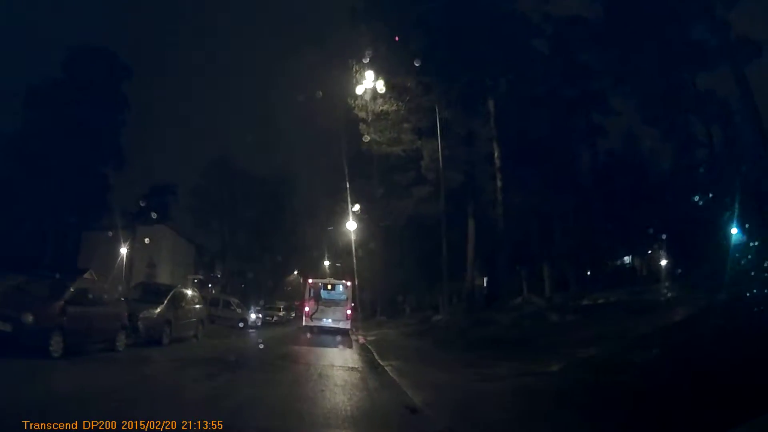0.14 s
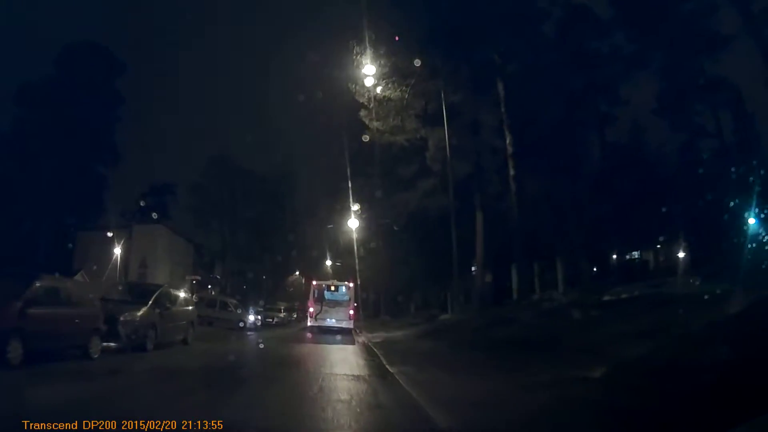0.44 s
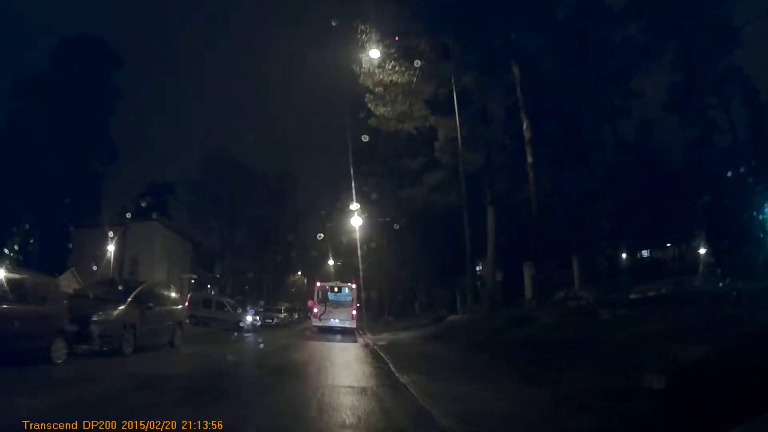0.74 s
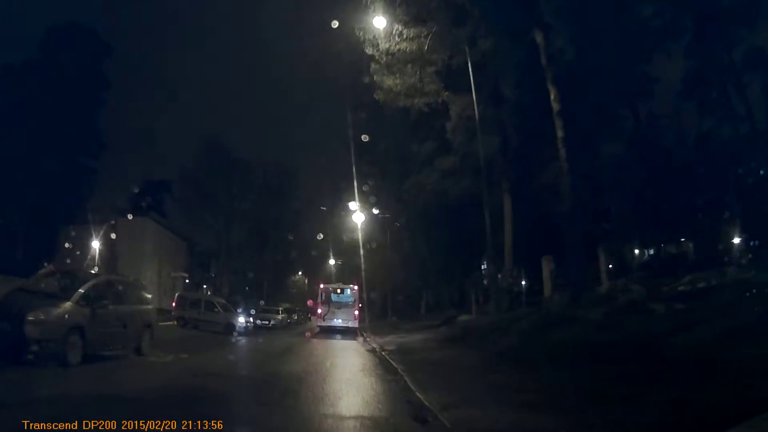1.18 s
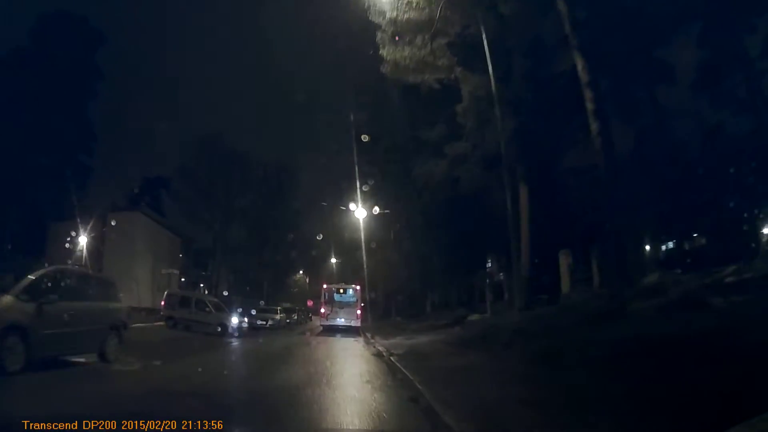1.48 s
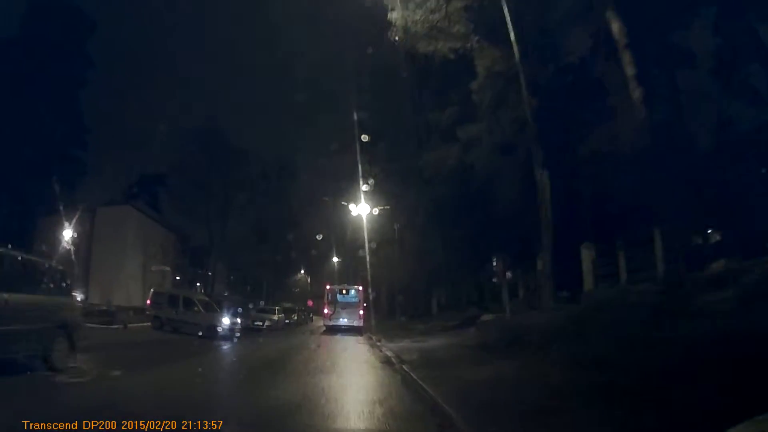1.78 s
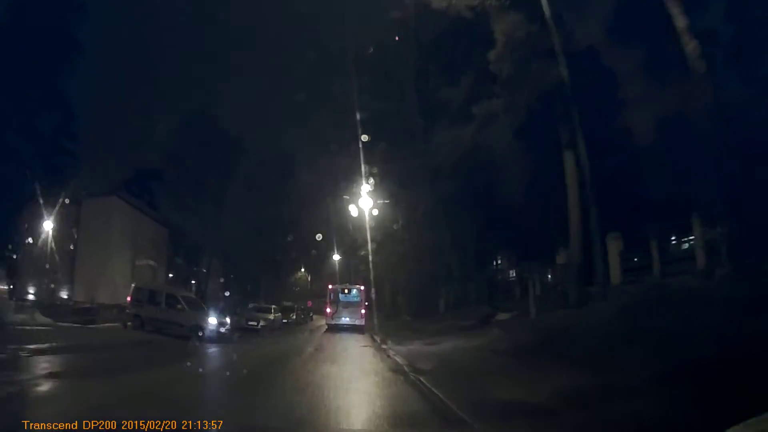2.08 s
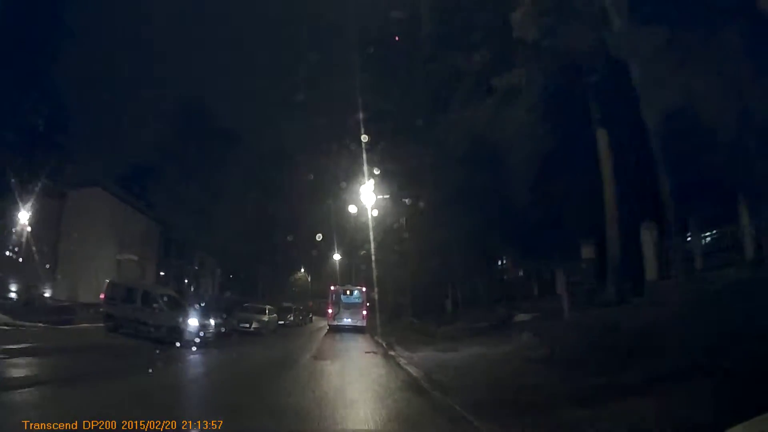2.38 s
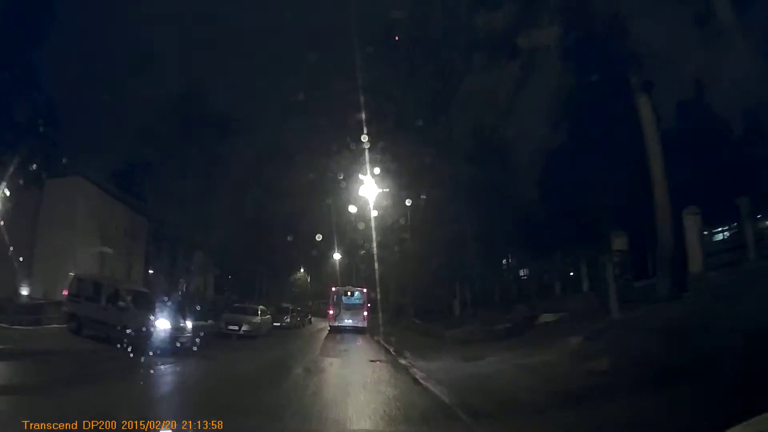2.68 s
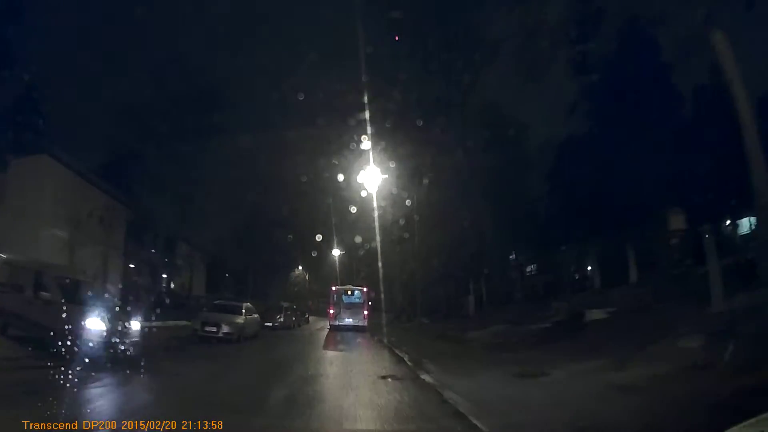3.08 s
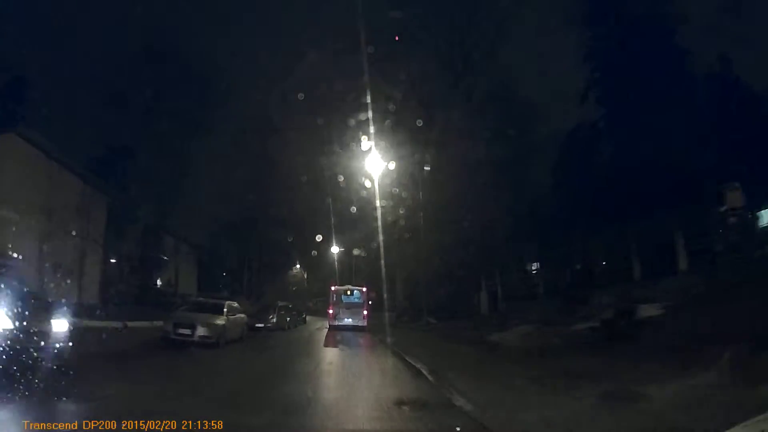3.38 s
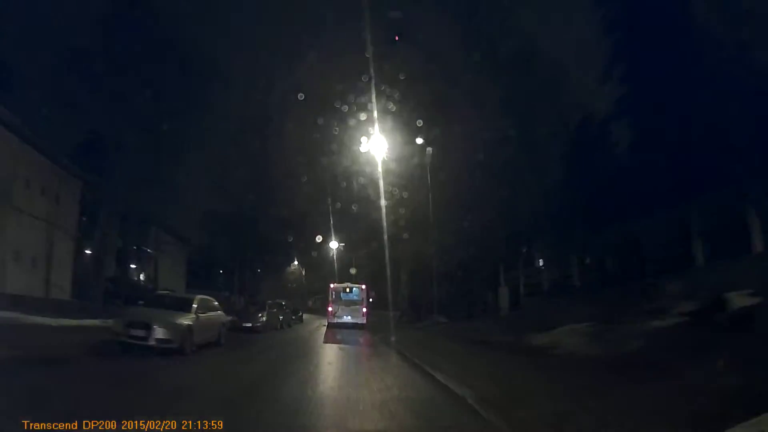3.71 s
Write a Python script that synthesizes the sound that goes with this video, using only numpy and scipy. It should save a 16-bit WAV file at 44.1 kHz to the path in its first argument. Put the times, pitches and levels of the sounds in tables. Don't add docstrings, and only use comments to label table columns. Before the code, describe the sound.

Inside a moving car, the engine's low drone climbs in pitch and gets louder, with muffled road noise and faint hiss. One loud dry click lands near the microphone halfway, then faint trim squeaks follow.

```python
import sys
import numpy as np
from scipy import signal
from scipy.fft import rfft, irfft
from scipy.io import wavfile
from scipy.ndimage import uniform_filter1d

SR = 44100
rng = np.random.default_rng(int(sys.argv[2]) if len(sys.argv) > 2 else 0)


def bounce(signal):
    frames = np.transpose(np.atleast_2d(signal))
    limited = np.clip(frames, -1, 1)
    pcm = np.round(limited * 32767).astype(np.int16)
    wavfile.write(sys.argv[1], SR, pcm)


def gain_from_db(level_db):
    decades = np.asarray(level_db, float) / 20
    return 10 ** decades


N = 169785


def level(x, db):
    return x * gain_from_db(db) / np.sqrt(np.mean(x ** 2))


def band(x, hz, width_hz):
    return signal.lfilter(*signal.iirpeak(hz, hz / width_hz, fs=SR), x)


def walk(rate_hz):
    hold = int(SR / rate_hz)
    steps = np.repeat(rng.standard_normal(N // hold + 1), hold)
    slewed = uniform_filter1d(uniform_filter1d(steps, hold), hold)
    return 1.74 * slewed[:N]


def coloured(spectrum, flicker_db, rate_hz):
    hz, db = np.array(spectrum, float).T
    f = np.maximum(np.arange(N // 2 + 1) * SR / N, 1)
    place = np.log(f / hz[0]) / np.log(hz[-1] / hz[0])
    gain = gain_from_db(np.interp(np.log(f), np.log(hz), db, left=-120, right=-120))
    out = 0
    for centre in np.linspace(0, 1, num=6):
        share = np.sqrt(np.clip(1 - 5 * np.abs(place - centre), 0, 1))
        part = irfft(rfft(rng.standard_normal(N)) * gain * share, N)
        out = out + gain_from_db(flicker_db * walk(rate_hz)) * part
    return out


def firing_turns(t):
    # time in seconds, firing rate in Hz.
    firing_rate = [(0.0, 31.28), (0.11, 32.23), (0.21, 32.76), (0.37, 34.7), (0.47, 34.95), (0.74, 38.3),
                   (1.18, 44.52), (1.99, 55.16), (2.1, 57.03), (2.51, 63.32), (3.45, 74.87), (3.85, 79.96)]
    rate_hz = np.interp(t, *np.array(firing_rate).T)
    return np.cumsum(rate_hz * (1 + .001 * walk(15))) / SR


def cabin(x):
    # centre in Hz, width in Hz, level in dB.
    resonances = [(72, 30, -16.5), (102.8, 19, -9.5), (145.9, 13.7, 1), (161.5, 18.2, -4),
                  (188.6, 8.2, -10.5), (235.5, 27.3, -4.5), (256.4, 20.2, -5), (285.4, 19.4, -2.5),
                  (346.8, 22, 3), (374.5, 30, -9.5), (425, 40, -10), (490.4, 12, -12), (540, 18, -12),
                  (670, 240, -11)]
    return sum(gain_from_db(db) * band(x, hz, width_hz) for hz, width_hz, db in resonances)


def engine(t, turns):
    order_db = [1, 0, -3, -4.5, -10, -13.5, -13, -19, -19, -19.5]
    # time in seconds, level in dB.
    load = [(0, -14), (.15, -5.5), (.35, -2.5), (.55, 0.5), (.75, -4), (1, -4), (1.2, -5), (1.35, -2.5),
            (1.7, -3), (2.1, -1), (2.4, 0), (2.7, 1.5), (2.95, 1.5), (3.2, 3), (3.5, 2), (3.85, 1.5)]
    engine_db, half_order_db, low_cut_hz = -40.5, -26, 48
    wander_db, wander_db_per_order = .4, .25
    out = 0
    for k, db in enumerate(order_db):
        multiple = np.cos(2 * np.pi * (k + 1) * turns)
        out = out + gain_from_db(db + (wander_db + k * wander_db_per_order) * walk(9)) * multiple
        half = np.cos(2 * np.pi * ((k + .5) * turns + rng.random()))
        out = out + gain_from_db(half_order_db + 3.9 * walk(5.6)) * half
    out = out * gain_from_db(np.interp(t, *np.array(load).T))
    out = signal.sosfilt(signal.butter(4, low_cut_hz, "high", fs=SR, output="sos"), out)
    return gain_from_db(engine_db) * cabin(out)


def road(t, turns):
    # frequency in Hz, density in dB per Hz.
    rumble_spectrum = [(18, -41), (30, -11.5), (65, -5), (135, -5.5), (197, -3.5), (571, -1), (718, -10),
                       (860, -6.5), (1500, -33), (1950, -67), (3300, -120)]
    # frequency in Hz, density in dB per Hz.
    hiss_spectrum = [(760, -19.5), (1300, -1), (1360, -6), (1630, -8.5), (2280, -6), (2590, -2.5),
                     (3000, -14.5), (3440, -14.5), (3900, -29), (5070, -57.5), (8580, -120)]
    # centre in Hz, width in Hz, level in dB.
    panels = [(566, 89, -9.5), (881, 200, -7), (2570, 180, 0)]
    rumble_db, rumble_rise_db_s, rumble_cabin_db = -48.5, 1, -17.5
    hiss_db, hiss_rise_db_s = -68.5, .76
    throb_depth, panel_db = .13, -10

    rumble = coloured(rumble_spectrum, flicker_db=.5, rate_hz=8)
    rumble = level(level(rumble, 0) + level(cabin(rumble), rumble_cabin_db), rumble_db)
    hiss = level(coloured(hiss_spectrum, flicker_db=.66, rate_hz=27), hiss_db)
    from_middle_s = t - t[-1] / 2
    both = rumble * gain_from_db(rumble_rise_db_s * from_middle_s) + hiss * gain_from_db(hiss_rise_db_s * from_middle_s)
    both = both * (1 + throb_depth * np.cos(2 * np.pi * turns))
    ringing = sum(gain_from_db(panel_db + db) * band(both, hz, width_hz / 2) for hz, width_hz, db in panels)
    return both + ringing


def high_hiss(t):
    # frequency in Hz, density in dB per Hz.
    hiss_spectrum = [(2410, -42.5), (4100, -7), (4520, -0.5), (6670, -5.5), (7860, -4.5), (8700, -10.5),
                     (9490, -3.5), (11000, -16.5), (13000, -23.5), (16900, -62), (22000, -120)]
    # centre in Hz, width in Hz, level in dB.
    ridge_bands = [(5840, 270, -3), (7800, 350, -8.5), (9400, 400, 3.5), (10750, 200, 4), (11560, 250, -9)]
    # centre in seconds, half width in seconds, rise in dB.
    swell_s, swell_half_width_s, swell_db = (2.4, .45, 2)
    noise_db, ridges_db = -81.5, -1.1
    flat = coloured(hiss_spectrum, flicker_db=.4, rate_hz=60)
    ridges = 0
    for hz, width_hz, db in ridge_bands:
        ridges = ridges + gain_from_db(db + .86 * walk(70)) * level(band(flat, hz, width_hz), 0)
    swell = gain_from_db(swell_db * np.exp(-((t - swell_s) / swell_half_width_s) ** 2))
    return level(level(flat, 0) * swell + level(ridges, ridges_db), noise_db)


def clock_ticks(t):
    frame_hz, decay_ms = 30, 4
    tick_hz, width_hz, tick_db = 11600, 1100, -100
    decay = np.exp(-(t * frame_hz % 1) / frame_hz * 1000 / decay_ms)
    noise = band(band(rng.standard_normal(N), tick_hz, width_hz), tick_hz, width_hz)
    return level(decay * noise * gain_from_db(1.5 * walk(15)), tick_db)


def squeaks(t):
    # start in seconds, length in seconds, centre in Hz, width in Hz, level in dB.
    rubs = [
        (.86, .08, 6850, 200, -85.5),
        (.86, 0.061, 10300, 250, -88),
        (0.839, 0.12, 8500, 5000, -89),
        (2.827, .135, 9400, 600, -81.5),
        (2.824, .13, 7800, 400, -88),
        (2.833, 0.15, 7000, 6000, -87),
        (2.894, .006, 5000, 1500, -77),
        (2.992, .006, 5000, 1500, -72),
        (3.79, 0.055, 9400, 1500, -88),
    ]
    ramp_s = .003
    out = 0
    for start_s, length_s, hz, width_hz, db in rubs:
        gate = np.clip(np.minimum(t - start_s, start_s + length_s - t) / ramp_s, 0, 1)
        noise = band(band(rng.standard_normal(N), hz, width_hz), hz, width_hz)
        out = out + gate * level(noise, db)
    return out


def latch(t):
    # start in seconds, push in dB, rise in ms, hold in ms, buzz in dB.
    contacts = [
        (1.91998, -15.3, .19, .01, -41),
        (1.92316, -25.5, .05, .4, -36),
        (1.92669, -30, .05, .22, -45),
    ]
    full_fall_ms, rebound_hz, top_hz = .48, 140, 10600
    buzz_hz, undertone_hz, undertone_db, buzz_ms = 8800, 4900, -1, .27
    out = 0
    for way, (start_s, push_db, rise_ms, hold_ms, buzz_db) in zip((-1, 1, 1), contacts):
        since_s = t - start_s
        since_ms = since_s * 1000
        fall_ms = full_fall_ms * min(1, 5 * rise_ms)
        push = np.interp(since_ms, np.cumsum([0, rise_ms, hold_ms, fall_ms]), [0, 1, 1, 0])
        buzz = np.sin(2 * np.pi * buzz_hz * since_s)
        buzz = buzz + gain_from_db(undertone_db) * np.sin(2 * np.pi * undertone_hz * since_s)
        decay = (since_ms > 0) * np.exp(-(since_ms / buzz_ms) ** 2)
        out = out + way * (gain_from_db(push_db) * push + gain_from_db(buzz_db) * decay * buzz)
    out = signal.lfilter(*signal.butter(2, rebound_hz, "high", fs=SR), out)
    return signal.sosfilt(signal.butter(6, top_hz, fs=SR, output="sos"), out)


def scene():
    t = np.arange(N) / SR
    turns = firing_turns(t)
    return (engine(t, turns) + road(t, turns) + latch(t))[None]


def low_pass(x):
    return signal.sosfilt(signal.butter(12, 13140, fs=SR, output="sos"), x)


def record(dry):
    noise_top_hz, notch_hz, notch_width_hz = 12500, 4000, 550
    t = np.arange(N) / SR
    faint = high_hiss(t) + clock_ticks(t) + squeaks(t)
    faint = signal.sosfilt(signal.ellip(6, .3, 50, noise_top_hz, fs=SR, output="sos"), faint)
    mix = signal.lfilter(*signal.iirnotch(notch_hz, notch_hz / notch_width_hz, fs=SR), dry + faint)
    return low_pass(mix)


dry = scene()
out = record(dry)
bounce(out)
```